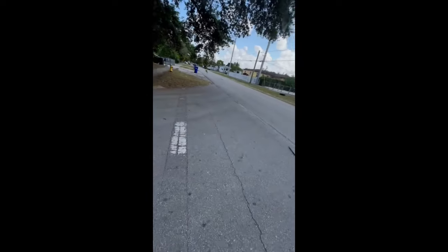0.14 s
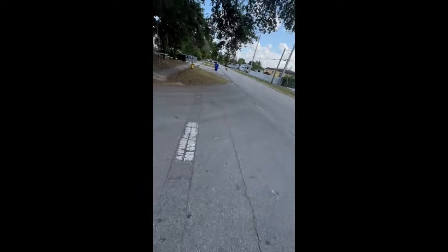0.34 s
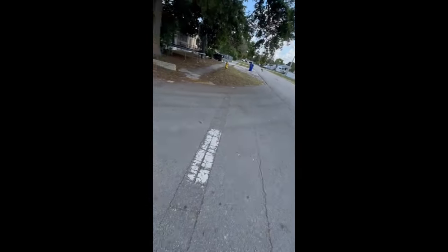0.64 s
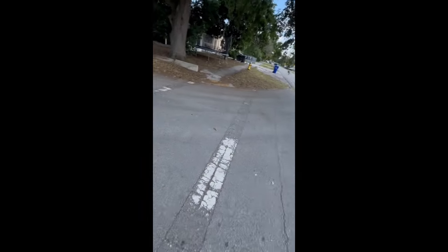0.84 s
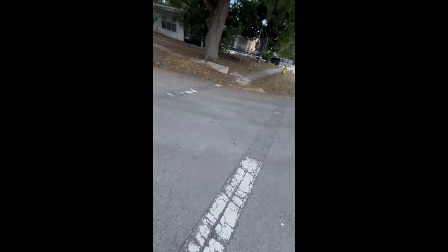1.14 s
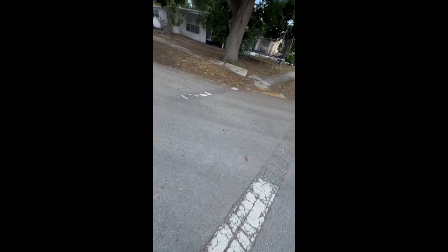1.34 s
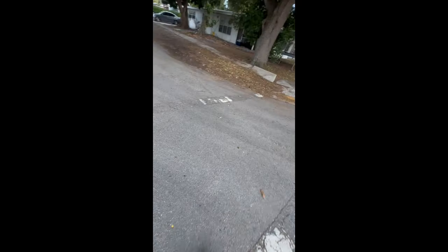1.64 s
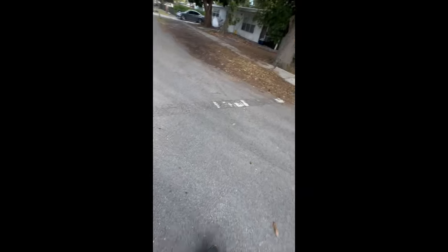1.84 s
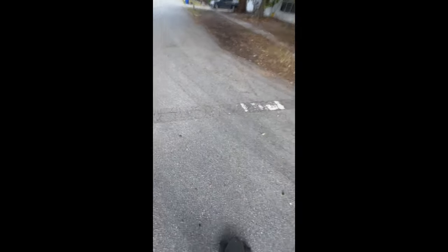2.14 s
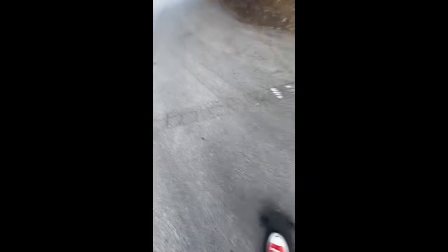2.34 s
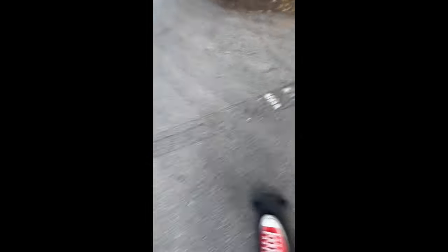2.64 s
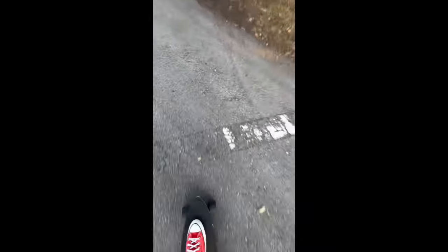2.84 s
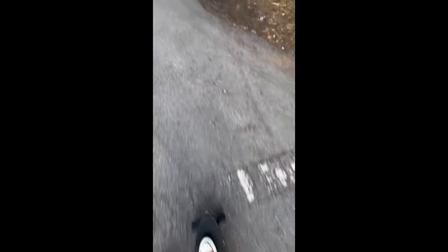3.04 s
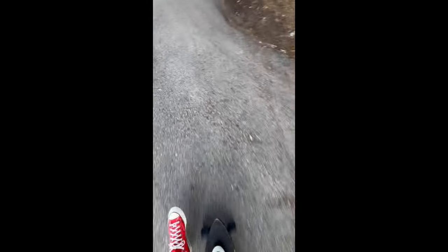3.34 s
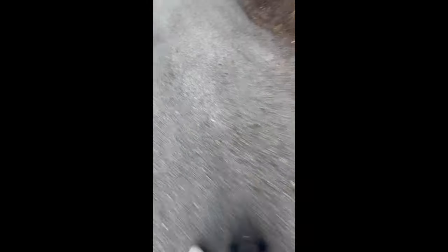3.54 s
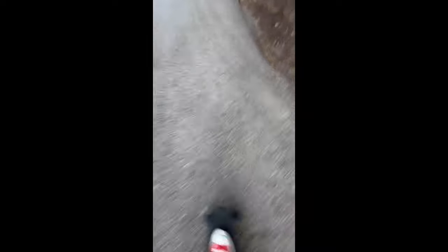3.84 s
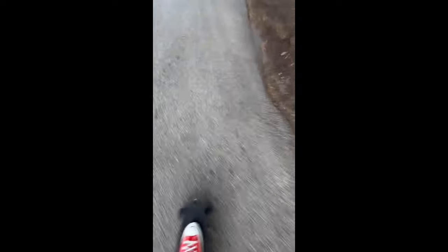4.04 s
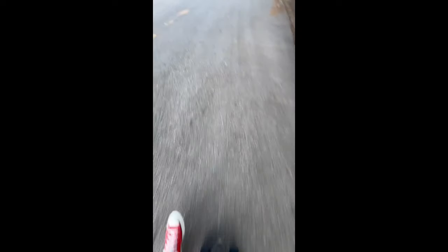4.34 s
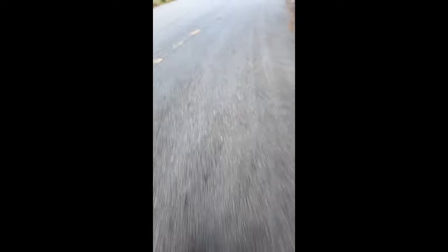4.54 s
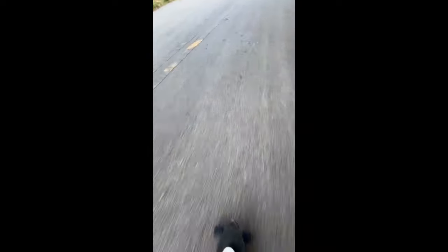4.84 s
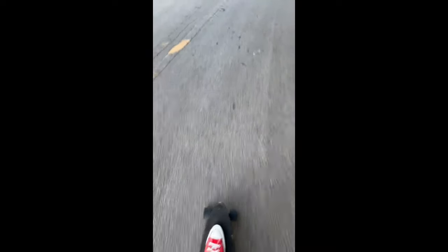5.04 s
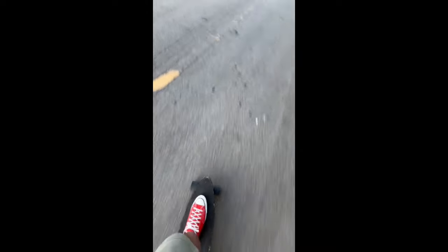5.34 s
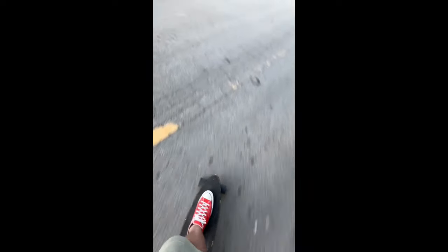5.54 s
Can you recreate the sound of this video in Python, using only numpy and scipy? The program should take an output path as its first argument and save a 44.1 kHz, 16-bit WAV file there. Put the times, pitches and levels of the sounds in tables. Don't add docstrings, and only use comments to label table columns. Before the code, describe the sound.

Hard wheels roll on coarse asphalt beneath a wooden deck. First a distant car sweeps past and dwindles, with faint leafy hiss. Then the phone tips toward the board: brighter rattles, sharp stone snaps and metallic knocks arrive in clusters, with low wind buffets. The close, stereo outdoor sound ends on a heavy hollow deck drone and whirr.

```python
import sys
import numpy as np
from scipy import signal
from scipy.fft import rfft, irfft
from scipy.io import wavfile
from scipy.ndimage import uniform_filter1d

SR = 44100
rng = np.random.default_rng(int(sys.argv[2]) if len(sys.argv) > 2 else 0)


def waveform_to_disk(signal):
    frames = np.transpose(np.atleast_2d(signal))
    scaled = np.clip(frames, -1, 1) * 32767
    samples = np.round(scaled).astype(np.int16)
    wavfile.write(sys.argv[1], SR, samples)


def volts_from_decibels(level):
    exponent = np.asarray(level, float) / 20
    return 10 ** exponent


N = 251414
T = np.arange(N) / SR
HZ = np.arange(N // 2 + 1) * SR / N

# time in seconds, deck rumble in dB, upper deck modes over the rumble in dB.
ROLL = [(0.0, -62, 23.5), (0.16, -40.5, 5), (0.6, -34, 0), (0.68, -53, -8), (0.81, -34, -8), (2.1, -42, -1),
        (2.38, -36.5, -5), (2.58, -43.5, -3.5), (2.9, -37.5, -2.5), (3.12, -39.5, 1.5), (3.55, -38, -9.5),
        (3.78, -24, -10.5), (4.08, -27.5, -2.5), (4.5, -28, -10), (4.84, -24, -5), (4.97, -28, -2),
        (5.3, -23.5, -3), (5.7, -34, 5.5)]
# start in seconds, hold in seconds, rumble in dB.
BUMPS = [
    (0.75, 0, -31.5),
    (2.44, 0.0083, -33),
    (2.76, 0.047, -33),
    (3.27, 0.1, -38),
    (4.59, 0, -38),
    (5.03, 0.077, -26.5),
    (5.2, 0, -25.5),
    (5.32, 0, -36),
    (5.4, 0.006, -28),
    (5.6, 0, -45),
]
# centre in Hz, width in Hz, level in dB.
DECK_LOW = [(134, 52, -5.5), (189.6, 144, 0), (260.4, 46.7, 2), (298.7, 53, -11.5)]
DECK_HIGH = [(426.6, 79, 0.5), (504.6, 105, 1.5), (556, 96, 4), (652, 150, -5)]
# centre in Hz, width in Hz, level in dB.
METAL_LOW = [(2200, 190, -0.5), (2450, 180, 2.5), (2650, 76, -3.5), (3300, 730, 2.5), (4450, 640, -4.5),
             (4700, 880, -2.5)]
METAL_HIGH = [(6270, 1340, 1), (7660, 750, 2.5), (8370, 690, -1.5), (9100, 940, -4.5)]
METAL_TOP = [(11980, 400, 9), (13150, 500, -11), (14500, 1000, 1)]
# centre in Hz, width in Hz, level in dB.
GRIND = [(720, 285, 1.5), (1094, 300, -4), (1490, 640, -10), (1900, 520, -17.5)]
# start in seconds, hold in seconds, then low rattle, high rattle
# and thin top ring in dB.
SHAKES = [(2.345, 0.15, -53, -63, -68), (2.7, 0.12, -70, -57, -74), (2.95, 0.043, -45.5, -53.5, -72),
          (3.26, 0.017, -44, -57, -67), (3.305, 0.0094, -32.5, -40, -56), (3.335, 0.105, -38, -42.5, -54),
          (3.48, 0.021, -36, -47, -60), (3.57, 0.011, -38.5, -51, -76), (3.635, 0.023, -46.5, -48, -70),
          (3.74, 0.15, -42.5, -49, -76), (3.91, 0.15, -47, -51.5, -63), (4.1, 0.81, -52, -56, -74),
          (4.48, 0.007, -37, -44, -83), (4.57, 0.018, -36, -45, -64), (4.648, 0.0036, -29.5, -41, -72),
          (4.667, 0.048, -26.5, -42, -72), (4.742, 0.033, -25.5, -38.5, -67), (4.775, 0.062, -29, -39, -58),
          (4.84, 0.14, -37, -36.5, -50.5), (5.0, 0.17, -45.5, -50, -64), (5.152, 0.16, -35, -37.5, -47.5),
          (5.36, 0.11, -49, -53, -70), (5.69, 0.051, -44, -63, -71)]
# low, high and top level in dB, at a rumble of -35 dB.
RATTLE_REST = (-55.5, -56, -75.5)
# frequency in Hz, level in dB per Hz.
ROAR_COLOUR = [(88, -56), (150, -25), (242, 0.5), (409, -7), (611, -6.5), (750, -6), (913, -3.5),
               (1220, -6), (2410, -24), (2690, -20.5), (4990, -45), (6000, -49), (7800, -85), (13200, -120)]
# frequency in Hz, level in dB per Hz.
WIND_COLOUR = [(20, -12), (40, -5.5), (55, -6.5), (69, -1.5), (85, -6.5), (120, -3.5), (160, -17),
               (300, -21), (700, -36.5)]
# frequency in Hz, level in dB.
EDDY_COLOUR = [(20, -6), (80, 1), (250, 2.5), (700, 5)]
# time in seconds, level in dB, unlike share in dB.
BREEZE = [
    (0.0, -51, 18),
    (0.3, -50, 19),
    (0.54, -42, 16),
    (0.85, -52, 17.5),
    (2.0, -38, 0),
    (3.5, -44.5, 9),
    (4.5, -35.5, 9),
    (5.7, -48, -3),
]
# start in seconds, hold in seconds, level in dB, unlike share in dB.
GUSTS = [(0.64, 0.1, -37.5, 21.5), (0.75, 0, -33, 9), (2.314, 0.22, -36, 8), (2.613, 0.00091, -17.5, -3),
         (2.675, 0.017, -20.5, 1), (2.733, 0, -19, 6), (2.763, 0.11, -31.5, 8), (3.085, 0.12, -34.5, -5),
         (3.26, 0.063, -35.5, -3), (3.43, 0.00092, -33.5, -9), (3.638, 0, -23, -16),
         (3.753, 0.26, -23.5, 0.5), (3.82, 0.028, -22, -16), (4.184, 0.15, -30, -6),
         (4.586, 0.076, -41, 19), (4.8, 0.077, -24.5, 2), (4.982, 0.056, -18, -0.5), (5.13, 0, -19.5, -9),
         (5.195, 0.12, -21, 6.5), (5.388, 0.094, -21.5, 12), (5.6, 0, -22.5, 17.5), (5.675, 0.0016, -22, 8)]
# frequency in Hz, level in dB per Hz.
AIR = [(1200, 6), (2000, 3.5), (2600, -6), (3500, -1), (5000, -4), (7500, -9), (9500, -11.5), (10500, -17),
       (11500, -20)]
AIR_TOP = [(10500, 2), (11800, -5.5), (13500, -7), (15000, -3.5), (15700, -3)]
# time in seconds, level in dB.
INSECT = [
    (1.15, -90),
    (1.3, -67),
    (1.6, -69),
    (1.75, -72),
    (1.9, -66),
    (2.05, -94),
]
# start in seconds, peak in dB, centre in Hz,
# left minus right in dB, bright snap over the peak in dB.
GRIT = [(0.0475, -34, 6900, 7, -41), (0.0932, -26.5, 6400, 4.5, -3), (0.1376, -33, 8450, 3, -27),
        (0.191, -31, 12500, 6, -3), (0.3557, -25, 13000, -4, -10), (0.5407, -35, 5900, -7, 1),
        (0.615, -32, 6000, 6, -21), (0.67, -32.5, 7300, -1, -32), (1.0123, -35, 8500, -3, -11),
        (0.126, -37, 9000, 0, -6), (0.1995, -42, 11000, 0, -6), (0.398, -34, 8000, 0, -9),
        (1.837, -44, 9050, -9, -22), (1.8894, -39, 4110, 3, 8), (2.69, -43, 7260, 18, -23),
        (5.1058, -30, 7790, -2, 3)]
# start in seconds, peak in dB,
# centre in Hz, left minus right in dB, bright snap over the peak in dB.
CRACKS = [(2.342, -28.5, 3000, -3, -10), (2.959, -28.5, 4330, -3, -8), (3.2909, -31, 8030, 1, -8),
          (3.3079, -30, 7240, 7, -8), (3.3204, -33, 7550, -1, -8), (3.3493, -28, 7720, -7, -8),
          (3.3614, -30, 7800, 3, -8), (3.4234, -30, 4790, -5, -8), (3.4354, -37, 6600, 1, -8),
          (3.4655, -28.5, 7160, -2, -8), (3.7374, -44, 7810, -0.5, -8), (3.7524, -32, 4290, 1, -8),
          (3.8591, -26.5, 7400, 8, -8), (4.0294, -33, 5150, -5, -8), (4.0816, -27.5, 4000, -5, -7),
          (4.145, -37, 5040, -0.5, -8), (4.3424, -32, 4960, 2, -8), (4.369, -31, 5100, 10, -8),
          (4.4094, -29, 4990, -2, -10), (4.4303, -26, 4860, -1, -8), (4.4563, -26, 3960, 3, -21),
          (4.4802, -28, 4880, 2, -8), (4.557, -22, 4870, -1, -8), (4.6487, -20.5, 6900, -2, -11),
          (4.664, -25, 8170, 5, -8), (4.6698, -19, 7280, 1, -8), (4.6954, -16, 4740, -3, -8),
          (4.7085, -16, 4450, -7, -15), (4.7584, -12.5, 5110, 0, -8), (4.839, -29, 6350, -1.5, -8),
          (5.1064, -39, 8090, 0.0, -8), (5.295, -34, 8040, 7, -8), (5.3114, -21, 8360, 4, -6),
          (5.3244, -32, 4970, 4, -8)]
# start in seconds, peak in dB, centre in Hz, left minus right in dB.
PINGS = [(1.013, -23.5, 4540, -7.5), (2.99, -32.5, 6370, 3), (3.3867, -23, 7150, 3), (3.576, -34, 3100, -1),
         (3.965, -18.5, 4100, -4), (4.4316, -27.5, 4000, -5), (4.4557, -19, 4060, -7.0),
         (4.4798, -15, 4050, -2.5), (4.596, -37, 3500, -2.0), (4.6151, -20.5, 3760, -5),
         (4.881, -23.5, 8670, 0.5), (5.155, -18.5, 8060, 2), (5.145, -31, 7940, 0), (5.168, -25, 8060, -2),
         (5.189, -26, 8100, 0), (5.197, -34, 7800, 0), (5.212, -22, 8150, 2), (5.223, -26, 8200, 1),
         (5.252, -25, 7950, 4), (5.261, -23, 8000, -3), (5.277, -29, 8300, 5), (5.206, -25.5, 5030, -2),
         (5.27, -27, 5000, -1), (3.634, -32.5, 2200, -5), (3.655, -42, 2480, -5), (3.687, -33, 2100, -6),
         (3.787, -34, 3000, -3), (3.83, -28, 2360, -4), (3.895, -33.5, 2320, 0), (3.905, -35, 2400, -1),
         (4.342, -34, 2600, -2), (5.156, -24, 3500, 2), (4.06, -34, 3800, -3), (4.097, -40, 6500, -1),
         (4.607, -25, 4530, -3), (4.79, -27, 4670, -2), (5.242, -22, 8230, 3), (5.2684, -34, 8200, 0.5),
         (5.2938, -27.5, 8000, 6), (5.316, -25, 4900, 1)]
AXLE_KNOCKS = [(2.353, -30, 2650, -6), (2.6888, -35, 2050, 9), (2.941, -33, 2380, -0.5),
               (3.279, -41, 2477, 1), (3.302, -32, 2450, 13), (3.3092, -20, 2800, -5),
               (3.3504, -47, 2100, -5), (3.409, -23.5, 2820, -1), (3.467, -30, 2640, -1),
               (3.739, -33, 2400, -16), (3.7524, -27.5, 2200, -11), (3.79, -28, 2530, -1),
               (3.822, -27, 2320, -5), (3.8596, -23, 2340, -6), (3.925, -29, 2440, -3),
               (4.03, -28, 2380, 2), (4.0833, -34, 2450, 0), (4.37, -23.5, 2650, -1), (4.41, -39, 2550, 0),
               (4.561, -24.5, 2320, -2), (4.649, -28, 2700, -3), (4.6705, -26, 2660, 3),
               (4.6801, -20, 2420, -10), (4.695, -20, 2240, -14), (4.709, -17, 2120, -4),
               (4.7404, -27, 2220, -6), (4.757, -13.5, 2200, -4), (4.81, -23.5, 2200, -11),
               (4.84, -24, 2590, -13), (5.198, -30, 2450, -4)]
SCUFFS = [(3.2554, -33, 2450, 3), (3.2605, -27.5, 2450, -13), (3.304, -24, 2550, -12),
          (3.3832, -32, 2450, -3.5), (3.3964, -22, 2560, -2.5), (3.4214, -22, 2700, -5),
          (3.435, -21, 3300, 2), (3.449, -29, 2380, -7), (3.4715, -21, 2560, -2.5),
          (3.4834, -40, 2410, -3.0), (3.5009, -30, 2390, -5), (3.5154, -24, 2790, -2.0),
          (3.5404, -29, 2100, -9), (3.5573, -28, 2780, -10), (3.5824, -47, 2700, -4),
          (4.634, -32, 2660, -12), (4.664, -19, 2650, -7), (4.686, -15, 2060, -1), (4.747, -23, 2170, -3.0),
          (4.7614, -27, 2500, -4), (4.7768, -24, 2240, -10), (4.7834, -15, 2550, -5),
          (4.7886, -12, 2450, -7.5), (4.8204, -20, 2640, -9), (4.8594, -28, 2530, -1),
          (4.8744, -21, 2370, -7), (4.9064, -34, 2380, -3.0), (5.0963, -27, 2400, -6.0),
          (5.1816, -26, 2610, -2), (5.214, -34, 2510, -3), (5.228, -33, 2550, -3)]
# start in seconds, hold in seconds, level in dB, pitch in Hz.
HUMS = [
    (0.29, 0.079, -34.5, 509),
    (0.503, 0.075, -31, 615),
    (2.463, 0.013, -33.5, 393),
    (2.508, 0.02, -33.5, 392),
    (5.276, 0.062, -28, 490),
    (5.332, 0.091, -27.5, 580),
    (5.435, 0.14, -26.5, 468),
    (5.487, 0.052, -34, 577),
]
# start in seconds, hold in seconds, level in dB.
DRONES = [
    (2.44, 0.069, -41),
    (3.83, 0.3, -33.5),
    (5.29, 0.26, -24.5),
    (5.62, 0.089, -23.5),
]
# centre in Hz, width in Hz, level in dB.
DRONE_MODES = [(487, 59, 3), (586, 84, -10)]
# start in seconds, hold in seconds, level in dB.
WHIRRS = [
    (3.76, 0.15, -59),
    (5.34, 0.57, -47),
]
# frequency in Hz, left lead in radians, left minus right in dB, likeness from
STREET_PORTS = [(0, -0.2, 3, 0.05), (1240, -1.5, -2.5, 0.74), (1780, 1.3, 2.5, 0), (2100, 4, 10, 0.4),
                (2700, 3.5, 2, 0.82), (3670, 2.5, 0, 0.57)]
BEHIND_PORTS = [(0, 0.38, 4, 1), (960, -1.68, -3.5, 0.43), (1510, 0.56, 0.5, 0.85),
                (3080, 0.6, -1.8, 0.073)]
BOARD_PORTS = [(0, 0.7, 0, 0.42), (261, 0.094, -0.5, 1), (575, 1.3, 1.5, 0.87), (740, 1.28, 10, 0.87),
               (1460, 1.87, 2.5, 1), (2200, 2.5, -5.5, 0.79), (2960, 1.05, -4, 0.35), (4000, 3.2, -3, 0.11)]
BODY_PORTS = [(4700, 2.4, -4, .6), (5100, 1.3, -1, .6), (5400, 3.0, 0, .93), (5650, 3.3, 0, .93),
              (7000, 5.6, 3, .55), (7900, 6.4, 1, .25), (9200, 7.2, 0, .65), (10400, 9.42, 0, .98),
              (11300, 9.5, 0, .95), (12300, 11.6, 0, .55), (13300, 12.57, 0, .98), (14000, 12.7, 0, .95),
              (14700, 13.8, 0, .55), (15700, 15.7, 0, .95)]
# low edge in Hz, high edge in Hz, lift of their sum in
# dB; the second row's edges are crossed, so it changes nothing.
LIFTS = [(5340, 6500, 4), (10400, 9100, 6.5)]


def noise():
    return rng.standard_normal(N)


def unit(x):
    return x / np.sqrt(np.mean(x ** 2))


def together(*dbs):
    return 10 * np.log10(sum(volts_from_decibels(db) ** 2 for db in dbs))


def curve(table):
    s, *columns = np.transpose(table)
    return [np.interp(T, s, c, left=-120, right=-120) for c in columns]


def bursts(table, rise_db_s, fall_db_s):
    t = np.arange(0, N + 32, 32) / SR
    rows = []
    for s, hold, *dbs in table:
        below = rise_db_s * np.maximum(s - t, 0) + fall_db_s * np.maximum(t - s - hold, 0)
        rows.append(np.array(dbs)[:, None] - below)
    return np.array([np.interp(T, t, db) for db in together(*rows)])


def walk(rate):
    k = int(SR / rate)
    steps = np.repeat(rng.standard_normal(N // k + 1), k)
    return 1.3 * uniform_filter1d(uniform_filter1d(steps, k), k)[:N]


def grains(rate, spread_db):
    when, size, sign = rng.random(N), rng.exponential(1, N), noise()
    return (when < rate / SR) * volts_from_decibels(np.minimum(spread_db * size, 30)) * np.sign(sign)


def colour(x, points):
    hz, db = np.transpose(points)
    gain_db = np.interp(np.log(HZ + 1), np.log(hz), db, left=-90, right=-90)
    return unit(irfft(rfft(x) * volts_from_decibels(gain_db), N))


def resonate(x, hz, sharpness):
    b, a = signal.iirpeak(hz, sharpness, fs=SR)
    return unit(signal.lfilter(b, a, signal.lfilter(b, a, x)))


def ring(x, modes):
    out = 0
    for k, (hz, width, db) in enumerate(modes):
        out = out + (-1) ** k * volts_from_decibels(db) * resonate(x, hz, hz / (1.5 * width))
    return unit(out)


def ports(direct, diffuse, table):
    hz, *columns = np.transpose(table + BODY_PORTS)
    lead, tilt_db, alike = (np.interp(HZ, hz, c) for c in columns)
    turn = np.exp(.5j * lead) * volts_from_decibels(tilt_db / 2)
    same = rfft(direct) * np.sqrt(1 + alike)
    other = rfft(diffuse) * np.sqrt(1 - alike)
    return irfft(np.array([(same + other) * turn, (same - other) / turn]), N)


def swinging(direct, diffuse):
    share = np.interp(T, [0.18, 0.98], [0, 1])
    ahead = np.sqrt(1 - share) ** 1.5 * ports(direct, diffuse, STREET_PORTS)
    return ahead + np.sqrt(share) ** 1.5 * ports(direct, diffuse, BEHIND_PORTS)


def ticks(table, sharpness, fade_s, rise_s, snap_hz, narrowing=0):
    out, t = np.zeros((2, N + 900)), np.arange(900) / SR
    snap = signal.butter(2, snap_hz, "band", fs=SR, output="sos")
    shape = np.exp(-t / fade_s) * np.minimum(t / rise_s, 1)
    for s, db, hz, pan_db, snap_db in table:
        hiss = rng.standard_normal(len(t))
        tone = resonate(hiss, hz, sharpness * (hz / 2500) ** narrowing)
        burst = (tone + volts_from_decibels(snap_db - 8.0) * signal.sosfilt(snap, hiss)) * shape
        i = int(s * SR)
        peak = volts_from_decibels(db + 1.0 + np.array([[pan_db], [-pan_db]]) / 2)
        out[:, i:i + len(t)] += burst / np.abs(burst).max() * peak
    hz, lag = np.transpose(BOARD_PORTS[:1] + BODY_PORTS)[:2]
    lead = np.exp(.5j * np.interp(HZ, hz, lag))
    return irfft(rfft(out[:, :N]) * np.array([lead, 1 / lead]), N)


def deck(low_db, high_db):
    def once():
        road = grains(rate=900, spread_db=2.0)
        low = volts_from_decibels(low_db + 0.5 * walk(15)) * ring(road, DECK_LOW)
        return low + volts_from_decibels(low_db + high_db + 0.5 * walk(48)) * ring(road, DECK_HIGH)
    return ports(once(), once(), BOARD_PORTS)


def chatter(modes, shared, rate, spread_db, wander_db):
    out = 0
    for mode in modes:
        hits = shared + grains(rate, spread_db) + 0.0082 * noise()
        out = out + volts_from_decibels(mode[2] + wander_db * walk(14)) * ring(hits, [mode])
    return unit(out)


def slips(rate, fade_s, rest):
    cycle = np.cumsum(rate * volts_from_decibels(1.9 * walk(30)) / SR)
    starts = np.diff(np.floor(cycle), prepend=0) * volts_from_decibels(3.0 * np.clip(noise(), -3, 1.3))
    fading = signal.lfilter([1], [1, -np.exp(-1 / (fade_s * SR))], starts)
    return unit(rest + uniform_filter1d(fading, size=90))


def rattle(low_db, high_db, top_db, grind_db):
    shake = slips(rate=95, fade_s=.0035, rest=.6)

    def once():
        jolts = .5 * grains(rate=210, spread_db=-6.0)
        sharp = jolts + grains(rate=220, spread_db=3.0)
        low = chatter(METAL_LOW, jolts, rate=900, spread_db=2.5, wander_db=0.5)
        high = chatter(METAL_HIGH, sharp, rate=500, spread_db=1.34, wander_db=-4.5)
        top = chatter(METAL_TOP, 0.91 * jolts, rate=770, spread_db=1.0, wander_db=1.5)
        grind = ring(jolts + grains(rate=2000, spread_db=3.0), GRIND)
        metal = volts_from_decibels(low_db - 5.0) * low + volts_from_decibels(high_db - 3.5) * high + volts_from_decibels(top_db + 0.5) * top
        return shake * metal + volts_from_decibels(grind_db - 1.95) * grind
    return ports(once(), once(), BOARD_PORTS)


def passing():
    nearest_s, speed_m_s, side_m, nearest_db, shadow_db_s = 0.71, 9.2, 13.3, -26, 5.5
    t = T - nearest_s
    return nearest_db - 20 * np.log10(np.hypot(1, speed_m_s * t / side_m)) - shadow_db_s * np.maximum(t, 0)


def car(db):
    def once():
        return volts_from_decibels(db - 3.5 + 1.24 * walk(34.3)) * colour(noise(), ROAR_COLOUR)
    return swinging(once(), once())


def street(hiss_db, top_db):
    def once():
        body = volts_from_decibels(hiss_db + 8.5 + 1.0 * walk(2.83)) * colour(noise(), AIR)
        return body + volts_from_decibels(top_db + 2.5 + 2.4 * walk(13)) * colour(noise(), AIR_TOP)
    song = volts_from_decibels(curve(INSECT)[0] + 2.0 * walk(23.3)) * ring(noise(), [(9200, 22, 0)])
    return swinging(once() + song, once())


def gusts():
    breeze_db, unlike_db = curve(BREEZE)
    rows = [(s, hold, db, db + share) for s, hold, db, share in GUSTS]
    same, other = bursts(rows, rise_db_s=294, fall_db_s=262)
    same_db = together(breeze_db, same)
    return same_db, together(breeze_db + unlike_db, other) - same_db - 5.5


def wind(db, unlike_db):
    mid, side = (colour(noise(), WIND_COLOUR) * volts_from_decibels(2.0 * walk(20)) for _ in range(2))
    eddies = colour(side, EDDY_COLOUR) * np.array([[1], [-1]])
    return volts_from_decibels(db) * (mid + volts_from_decibels(unlike_db) * eddies)


def grit():
    return volts_from_decibels(2.5) * ticks(GRIT, sharpness=0.86, fade_s=0.0021, rise_s=0.0001, snap_hz=(8000, 15500))


def hums():
    road, out = grains(rate=1600, spread_db=0.0), 0
    for s, hold, db, hz in HUMS:
        level_db = bursts([(s, hold, db)], rise_db_s=400, fall_db_s=400)[0]
        out = out + volts_from_decibels(level_db) * ring(road, [(hz, 83, 0)])
    return ports(out, np.roll(out, 900), BOARD_PORTS)


def knocks():
    pings = [row + (-20 + 11 * np.log2(row[2] / 4000),) for row in PINGS]
    scuffs = [(s, db - 4, hz, pan) for s, db, hz, pan in SCUFFS]
    axles = [row + (-11 - 2.8 * (row[1] + 28),) for row in AXLE_KNOCKS + scuffs]
    return ticks(pings + axles, sharpness=3.6, fade_s=0.0021, rise_s=0.001, snap_hz=(5000, 11000), narrowing=0.4)


def cracks():
    return volts_from_decibels(-1) * ticks(CRACKS, sharpness=1.0, fade_s=0.0022, rise_s=0.00071, snap_hz=(1800, 9000))


def drone():
    db = bursts(DRONES, rise_db_s=208, fall_db_s=214)[0] - 4.5

    def once():
        return volts_from_decibels(db + 3.1 * walk(30)) * ring(grains(rate=1600, spread_db=1.0), DRONE_MODES)
    return ports(once(), once(), BOARD_PORTS)


def whirr():
    db = bursts(WHIRRS, rise_db_s=150, fall_db_s=150)[0]

    def once():
        return volts_from_decibels(db + 1.0 * walk(25)) * ring(grains(rate=2200, spread_db=3.0), [(1500, 600, 0)])
    return ports(once(), once(), BOARD_PORTS)


def scene():
    roll_db, upper_db = curve(ROLL)
    rumble_db = together(roll_db, bursts(BUMPS, rise_db_s=304, fall_db_s=220)[0])
    load, car_db = roll_db + 35, passing()
    shade_db = np.interp(T, [2, 2.65], [-10.5, 0])
    shakes = bursts(SHAKES, rise_db_s=1198, fall_db_s=607)
    resting = np.array(RATTLE_REST)[:, None] + 0.35 * load + shade_db
    low, high, top = together(shakes, resting)
    lagging = uniform_filter1d(low, int(0.0064 * SR))
    grind = together(-48 + 0.94 * load + shade_db, lagging - 1)
    hiss = together(-64.5 + 0.16 * load, car_db - 32.5, high - 17)
    hiss_top = together(-63.5 + 0.33 * load + shade_db, car_db - 45)
    board = deck(rumble_db, upper_db) + rattle(low, high, top, grind) + hums() + drone() + whirr()
    stones = grit() + knocks() + cracks()
    return board + stones + car(car_db) + street(hiss, hiss_top) + wind(*gusts())


def guard(x):
    start_s, hold_s, ramp_s = 0.68, 0.038, 0.015
    edges = start_s + np.array([-ramp_s, 0, hold_s, hold_s + ramp_s])
    band = signal.sosfiltfilt(signal.butter(2, (290, 566), "band", fs=SR, output="sos"), x)
    return x - 0.83 * np.interp(T, edges, [0, 1, 1, 0]) * band


def lift_shared(x):
    db = 0
    for low, high, lift_db in LIFTS:
        db = db + np.interp(HZ, [low - 150, low, high, high + 150], [0, lift_db, lift_db, 0])
    shared = x.mean(axis=0)
    return x - shared + irfft(rfft(shared) * volts_from_decibels(db), N)


def top_cut(x):
    return signal.sosfilt(signal.butter(12, 15790, fs=SR, output="sos"), x)


def record(dry):
    mix = lift_shared(guard(dry))
    mix = signal.sosfilt(signal.butter(3, 42, "high", fs=SR, output="sos"), mix)
    mix = signal.sosfilt(signal.ellip(8, .2, 70, 15750, fs=SR, output="sos"), mix)
    return top_cut(mix)


dry = scene()
out = record(dry)
waveform_to_disk(out)
```